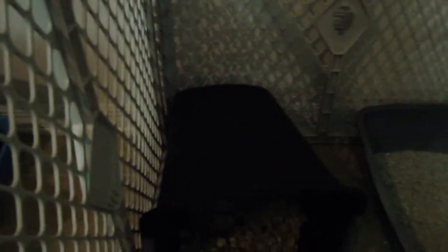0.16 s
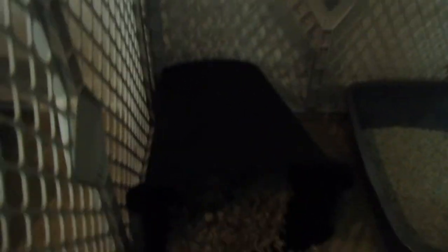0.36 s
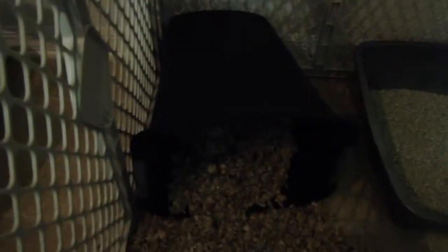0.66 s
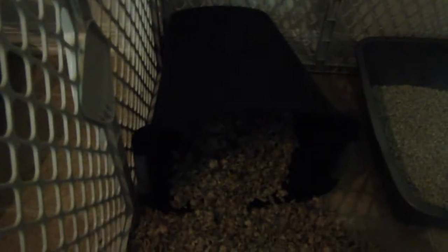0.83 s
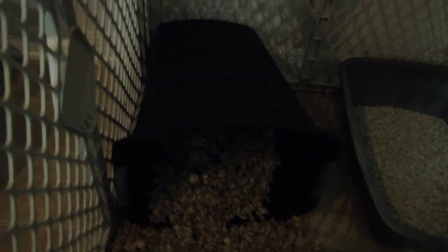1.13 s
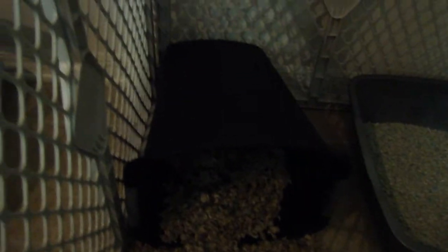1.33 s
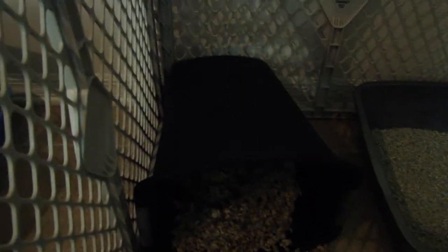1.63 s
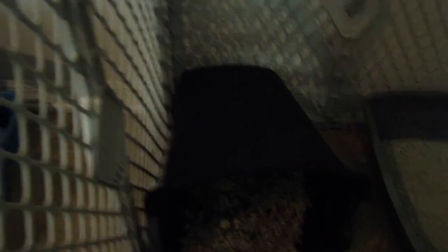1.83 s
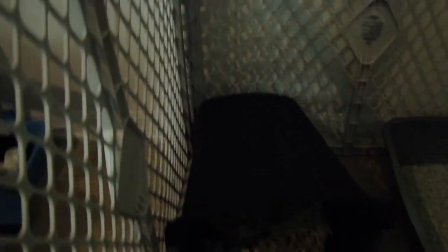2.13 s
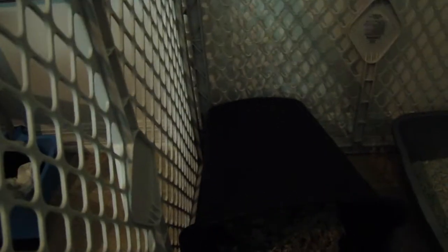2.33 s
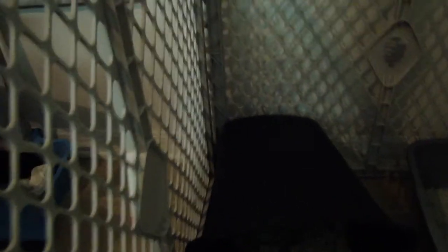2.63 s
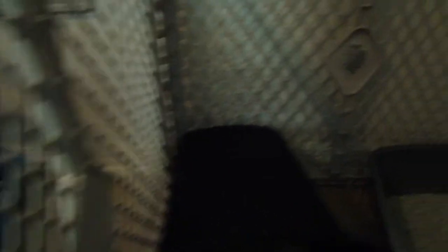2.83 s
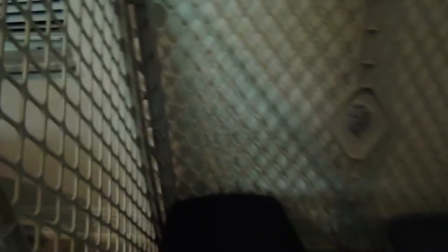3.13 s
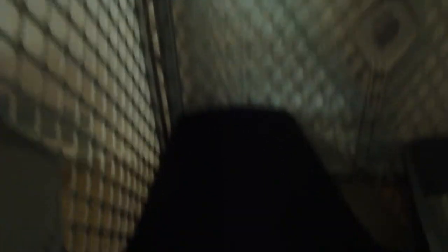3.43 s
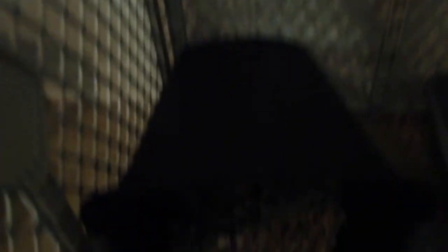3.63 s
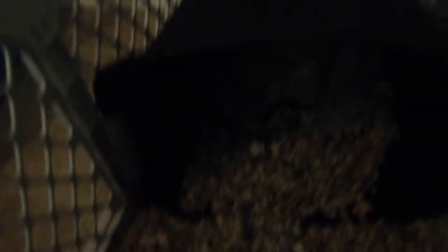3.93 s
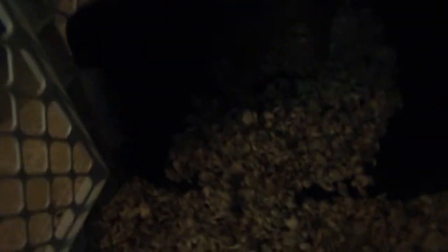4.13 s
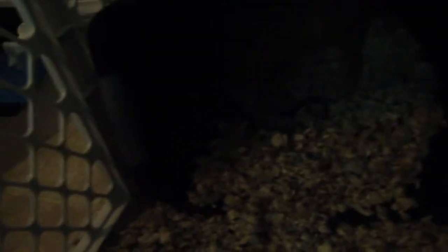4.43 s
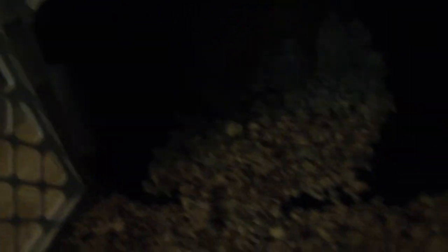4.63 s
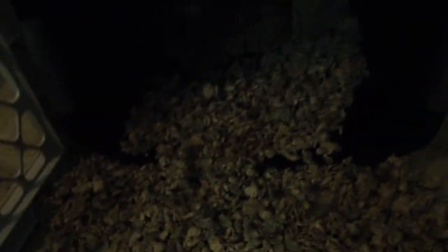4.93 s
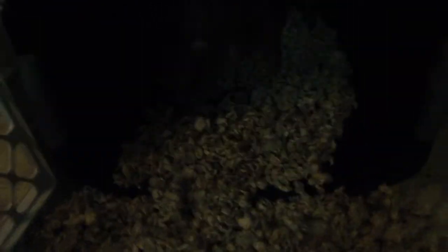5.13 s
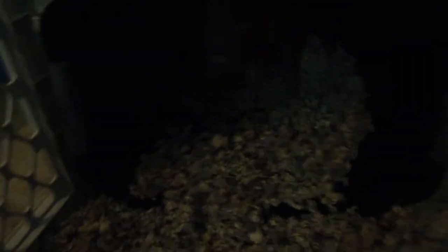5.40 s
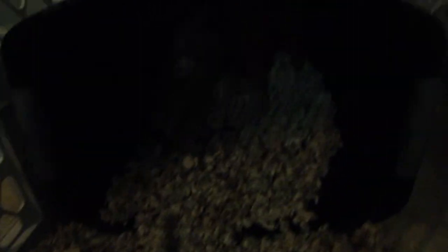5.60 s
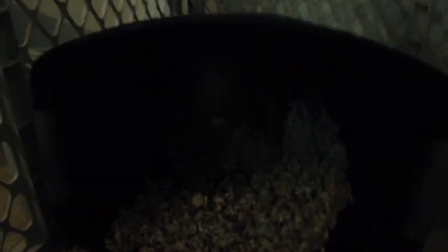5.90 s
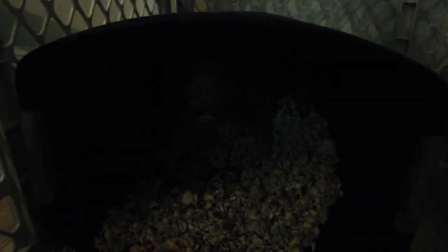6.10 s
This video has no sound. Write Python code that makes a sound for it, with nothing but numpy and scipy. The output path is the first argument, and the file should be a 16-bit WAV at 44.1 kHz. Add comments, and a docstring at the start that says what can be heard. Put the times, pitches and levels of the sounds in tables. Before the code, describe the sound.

Dry wood chips snap, click and rustle close by in irregular bursts, with falling crumbs, a hollow tub, faint wire rings and a thin squeak.

```python
"""Single wood chips snap and knock close by, each followed by a shower of smaller ones; some ring a wire pen.
Under them dry chips rustle, swelling and thinning out, a plastic tub booms along, and a thin squeak sounds twice.
Behind lies a quiet, humming room. Noise bursts through resonances make the snaps, filtered noise and damped sines
make the scrapes and the rustle, and plain sines make the wire, squeak and hums. Wide stereo, often in anti-phase."""
import sys
import numpy as np
from scipy.fft import rfft, irfft, next_fast_len
from scipy.io import wavfile
from scipy.ndimage import map_coordinates

SR = 44100
rng = np.random.default_rng(int(sys.argv[2]) if len(sys.argv) > 2 else 0)


def store_pcm(level_fs):
    """Save levels as 16-bit WAV."""
    pcm = np.round(np.clip(level_fs, -1, 1) * 32767).astype(np.int16)
    wavfile.write(sys.argv[1], SR, np.atleast_2d(pcm).T)


N = 276047

# the bright crack of breaking wood, as a tone colour: f/Hz, relative level/dB
CRACK = [(2500, -7), (4500, 0.5), (7000, -4), (10500, -5), (12500, -11.5), (14400, -43.5)]


def snaps():
    """A snap is a short burst: two modes of the chip, a thud of the bed and a bright crack; then debris falls."""
    # one snap a row: t/s, level/dB, chip f/Hz, crack level/dB, upper mode f/Hz, upper mode level/dB,
    # thud f/Hz, thud level/dB, left over right/dB, width setting (more is wider)/dB, shower level/dB, shower T60/s
    # (crack, upper mode, thud and shower levels are relative to the snap)
    snap_rows = [(0.049, -14.5, 1890, -4.5, 3750, -2, 437, -25, 1, 5.5, -18, 0.13),
                 (0.053, -21.5, 1460, -24, 3670, -0.5, 434, -19, 2.5, 3, -9, 0.073),
                 (0.077, -38, 2100, 1, 3500, -7, 434, -20, 3, 10, -11, 0.04),
                 (0.199, -33, 890, -8, 2500, -8, 430, -10, -1, 8, -4.5, 0.13),
                 (0.234, -32.5, 880, -3.5, 2500, 2, 680, -20, 1.5, 9, -9, 0.06),
                 (0.421, -40.5, 865, -22, 2470, -11, 442, -23, 1, -1, -7, 0.06),
                 (0.604, -29.5, 1490, -16, 2930, 3, 635, -38, 5, 6.5, -1.5, 0.05),
                 (0.625, -36.5, 2270, -30, 2470, -1, 360, -27, 9, 12, -21, 0.11),
                 (0.634, -38, 1440, -17, 2400, -1, 400, -24, 7, 10, -16, 0.045),
                 (0.699, -23.5, 1110, 9, 3170, 7.5, 356, -28, 3, 4, -17.5, 0.19),
                 (0.741, -34.5, 1490, -11, 2680, -5, 240, -12, -1, 6, -5.5, 0.089),
                 (0.751, -37.5, 1890, -2, 2450, -4, 427, -5, 3, 5, -16, 0.21),
                 (0.814, -36, 1420, -16, 2900, -12, 420, -10, 6, 6, -28, 0.085),
                 (0.865, -5.5, 1300, 3, 3420, 0.5, 383, -14, 1, -0.5, -7.5, 0.047),
                 (0.868, -17.5, 1210, 0.5, 3300, 2, 408, -13.5, -5, -1, -17, 0.063),
                 (0.87, -26, 1000, 9.5, 2780, 17, 340, -2.5, -9, 2, -15, 0.063),
                 (0.878, -17, 1480, 8, 3780, 5, 380, -10.5, 3, 6, -24, 0.26),
                 (0.8862, -24, 1190, -16, 3100, -5, 420, -9, -4, 2, -4, 0.053),
                 (0.8923, -32, 1400, 1, 5140, 0, 420, -16, 6.5, 5.5, -18.5, 0.39),
                 (1.359, -23.5, 1500, 6, 4460, -2.5, 656, -13, 2.5, 5, -22, 0.084),
                 (1.447, -41.5, 1900, -11, 2500, -1, 392, -10, 5, 11, -10.5, 0.27),
                 (1.669, -29, 2450, 10.5, 5000, 3, 426, -9, 5, 11, -1.5, 0.11),
                 (1.751, -38.5, 1470, -13, 2380, 0, 370, -23, 6.5, 14, -6, 1),
                 (1.83, -26, 740, 3, 3230, -1, 640, 0, 5, 7, -1, 0.096),
                 (1.8527, -28, 1810, 8, 2380, 14, 650, -1, 3.5, 8, 4.5, 0.12),
                 (1.862, -31, 1790, 4.5, 2700, 11, 500, -13, 5, 6, 3.5, 0.053),
                 (1.871, -35, 1500, 4, 2800, 17, 500, -11, 2, 5.5, 6, 0.055),
                 (1.881, -39, 1500, 13, 2800, 4, 404, -5, 2, 11, -8, 0.051),
                 (1.945, -20, 1920, 10.5, 2830, 9, 543, -15, 4, 8.5, -10, 0.31),
                 (1.957, -26, 1910, 5.5, 2750, 16, 540, -14, 7, 4, -8, 0.089),
                 (2.0, -42, 2300, 2, 2900, 11, 540, -25, -1, -5, -3.5, 0.16),
                 (2.31, -17, 1760, -20, 2350, -11, 500, -19.5, -3, 8, -22.5, 0.059),
                 (2.415, -46.5, 2290, -2, 2490, 0, 400, -8, -2, 9, -7, 0.33),
                 (2.486, -39.5, 1220, 7.5, 4680, -4, 398, -8, -1, 10, 3, 0.05),
                 (2.793, -45.5, 2270, 1, 2650, 5, 400, -13, 1, -4, -8, 0.093),
                 (2.853, -37.5, 1750, -20, 2400, -17, 460, -8, -2, 4, -6, 0.63),
                 (2.979, -33.5, 1920, -14, 2630, -7, 420, -7, 4, -5, -7, 0.073),
                 (3.1, -36, 1920, -9, 2970, -2, 410, -16, -5, 3, -12.5, 0.47),
                 (3.121, -37.5, 1680, 2.5, 3080, -1, 400, -11, 1, 5, -13, 0.26),
                 (3.155, -25, 830, -18, 2100, -14, 436, -6.5, 0.5, 8, -10, 0.12),
                 (3.19, -29, 1240, -25, 2900, -2, 298, 4.5, -0.5, -3, 0.5, 0.067),
                 (3.198, -34, 970, -28, 2540, -15, 250, 9.5, 3, -5, -24, 0.055),
                 (3.255, -36, 785, -17, 4030, -6, 250, -12, 1, 5, -8, 0.14),
                 (3.298, -24.5, 870, -18, 3400, -3.5, 300, -4, -0.5, -2, -17.5, 0.49),
                 (3.34, -40, 870, -20, 2640, -8, 640, 6, -10, 4, -16, 0.06),
                 (3.426, -42, 820, -28, 3910, -9, 493, 7.5, 1, -6, -23, 0.11),
                 (3.473, -38, 850, -6, 3150, -4, 288, 7.5, 2, -8, -5, 0.11),
                 (3.487, -37.5, 1190, -22, 3650, -6, 308, 4, -1, -8, -19, 0.056),
                 (3.523, -39, 1500, -20, 2900, -5, 400, -4, 5, -3, -3, 0.12),
                 (3.546, -28, 1730, -21, 2470, -9, 543, -12, 6, -6, -4, 0.11),
                 (3.552, -25, 1700, -15, 2420, -11, 536, -20, 2, -1, -9, 0.17),
                 (3.583, -28, 1130, -30, 2660, -10, 238, -20, 0, -6, -19, 0.074),
                 (3.599, -34, 2030, -25, 3040, -13, 244, 0, -6, -1, -22, 0.08),
                 (3.667, -43, 920, -25, 3040, -13, 240, -19, 1, -1, -18, 0.05),
                 (3.718, -31, 865, -21, 2540, -17, 605, -2, 0, 9, -4.5, 0.11),
                 (3.764, -34.5, 1290, -33, 2400, -15, 420, -1, -2, 7, -25, 0.11),
                 (3.806, -37.5, 2160, -29, 2340, -8, 310, -14, -3, -3, -8, 0.081),
                 (3.852, -33.5, 1200, -22, 2400, -12, 298, 0, 2, -4, -19, 0.067),
                 (3.873, -26, 970, -39, 2490, -12, 314, -4.5, 1, -7, -27, 0.041),
                 (3.88, -32, 1050, -30, 2400, -15, 258, -4, 2, -12, -2, 0.094),
                 (3.927, -36, 1110, -16, 2960, -17, 279, -2, 0, -12, -4.5, 0.13),
                 (3.985, -50, 1110, -11, 2670, 8, 280, -5, -2, 0, -15, 0.05),
                 (4.033, -41, 1680, -7, 2530, -10, 340, -9, 0, 6, -10, 0.05),
                 (4.075, -36, 1170, -29, 2570, -11, 593, -6, -3, 5, -25, 0.13),
                 (4.0993, -23.5, 1390, -23, 3360, -13, 550, -6, 5, 8, -27, 0.094),
                 (4.1945, -24, 1450, -9, 3400, -25, 610, 0, 2, 5, -6.5, 0.035),
                 (4.3045, -10.5, 1450, -14, 3900, -2, 710, -13.5, -1.5, 5, -15.5, 0.1),
                 (4.471, -26.5, 1300, -21, 3340, -9, 427, -16, -2, 5, -34, 0.18),
                 (4.57, -44, 1870, -23, 2380, -11, 460, -11, 0, -1, -10, 0.24),
                 (4.737, -34.5, 1040, -19, 2400, -9, 467, -4, -12, 5, -23, 0.11),
                 (4.746, -32, 1050, -14, 3450, 1.5, 536, -1.5, 2, 4, -8, 0.27),
                 (4.883, -21, 1430, -4, 3500, -6, 660, -9, -0.5, 5, -10, 0.061),
                 (4.895, -29.5, 1230, -36, 2400, -19, 430, -14, 4, 13, -17, 0.1),
                 (4.932, -36.5, 1310, -31, 2490, -21, 400, -1, -3, 4, -29, 0.1),
                 (4.977, -35.5, 1640, -22, 2400, -18, 440, -6, -3, 4, -7, 0.17),
                 (4.991, -22.5, 934, -33, 3340, -11, 610, -9, -3.5, 7, -14.5, 0.082),
                 (5.0, -30.5, 955, -8, 3210, -10, 430, -16, 0, 5, -13, 0.11),
                 (5.034, -36.5, 760, -17, 2410, -7, 590, -5, 0, 8, 2.5, 0.062),
                 (5.122, -30, 1060, -21, 2420, -14, 466, -3.5, -4, 7, -23, 0.33)]
    burst_t60_s, strike_s = 0.019, 0.0009
    strike = 60, 32, 24  # the clean blow against the noise of the break: chip, upper mode, thud
    low_cut_hz = 130  # chips are too small to sound much below this
    out = np.zeros((2, N + SR))
    t = np.arange(SR // 12) / SR
    blow = amp(-60 * t / burst_t60_s) * (1 - np.exp(-(t / 0.0016) ** 2))
    crack_blow = blow ** 3.6 * (1 - np.exp(-t / 0.0014))  # dies away sooner
    thud_blow = blow ** 0.31  # dies away later
    for (s, db, hz, crack_db, upper_hz, upper_db, thud_hz, thud_db,
         pan_db, wide_db, shower_db, shower_t60) in snap_rows:
        mid, other = rng.standard_normal((2, 4, len(t)))
        mid[:3, round(strike_s * SR)] += strike
        # the side signal is partly the mid, delayed a little
        side = 0.64 * np.roll(mid, rng.integers(3, 14), axis=1) + 1.14 * other
        # the thud is more alike at both ports
        side = side * amp(wide_db - 5.0) * [[1.1], [1.3], [.55], [1.1]]
        chip, upper, thud, crack = np.swapaxes([mid, side], 0, 1)

        # bright snaps are broad and dry, dull ones ring at the chip's pitch
        flat = amp(-13 + 0.66 * crack_db)

        def chip_tone(f):
            ringing = mode(f, hz, 0.26 * hz) * mode(f, hz, 0.89 * hz)
            return ringing + flat * mode(f, hz, 1.5 * hz)

        def upper_tone(f):
            return (mode(f, upper_hz, 0.16 * upper_hz) + flat) * mode(f, upper_hz, 0.51 * upper_hz)

        def thud_tone(f):
            narrower = mode(f, thud_hz, 0.77 * thud_hz) * mode(f, thud_hz, 0.79 * thud_hz)
            return narrower * mode(f, thud_hz, 3.0 * thud_hz)

        layers = [filtered(chip * blow, chip_tone),
                  filtered(upper * blow, upper_tone),
                  filtered(thud * thud_blow, thud_tone),
                  filtered(crack * crack_blow, lambda f: amp(along(CRACK, f)))]
        levels = 0, upper_db, thud_db, crack_db
        # each layer is set by the peak of its mid
        mid, side = sum(amp(level) * x / np.abs(x[0]).max() for x, level in zip(layers, levels))
        debris = shower(hz, crack_db, wide_db, shower_db, shower_t60)
        gain = amp(db + np.array([[.5], [-.5]]) * pan_db)
        at = round(s * SR)
        out[:, at:at + len(t)] += gain * [mid + side, mid - side]
        out[:, at:at + debris.shape[1]] += gain * debris
    return filtered(out[:, :N], lambda f: (1j * f / (low_cut_hz + 1j * f)) ** 2)


def shower(hz, crack_db, wide_db, level_db, t60):
    """Falling debris is fading clumpy noise that shares the pitch and brightness of the chip that broke."""
    # the part of the colour that all showers share: f/Hz, relative level/dB
    debris_colour = [(70, -54.5), (150, -9), (400, 6), (1300, 1), (2800, -4.5), (5000, -18.5),
                     (10500, -40.5), (12500, -26), (13600, -38)]
    t = np.arange(SR // 3) / SR

    def colour(f):
        pitch = np.abs(mode(f, hz, 1.2 * hz)) ** 2.9
        bright = amp(crack_db - 5.5 + along(CRACK, f))
        return pitch + bright + amp(along(debris_colour, f) - 5.0)

    debris = spread(grains(len(t), spiky_db=0.5, clump_s=0.0014), colour, narrow=0.59)
    fall = amp(level_db - 60 * t / t60) * (1 - np.exp(-t / 0.0037))
    return widened(debris, 0.38 * wide_db - 0.1) * fall


def mesh():
    """Flung chips ring several like wires as decaying sines; the ports hear the same wires at different phases."""
    # tones of the wire mesh: middle f/Hz, level against the hit/dB, T60/s
    wire_tones = [(1765, -16, 0.273), (2670, -6.5, .25), (3080, -7.5, 0.21), (3730, -7, 0.21),
                  (4570, -11.5, 0.31), (5880, -10, 0.246), (7470, -19.5, .25), (8300, -11, 0.222),
                  (10200, -12.5, 0.16), (10900, -4, 0.16)]
    # chips flung on the wire: t/s, level/dB
    hits = [(0.868, -41.5), (1.67, -41.5), (1.854, -35), (1.946, -30), (1.959, -36), (2.0, -43)]
    split = .045  # wires differ in length, so their tones scatter by this share
    out, t = np.zeros((2, N + SR)), np.arange(SR // 3) / SR
    hz, level, t60 = np.transpose(wire_tones)[:, :, None]
    for s, db in hits:
        at = round(s * SR)
        # nine wires
        for detune, size, turn in rng.standard_normal((9, 3, len(wire_tones), 1)):
            ring = amp(db + level + 1.5 * size - 60 * t / t60) * (1 - np.exp(-t / .002))
            phase = 2 * np.pi * hz * (1 + split * detune) * t
            left = (ring * np.sin(phase)).sum(0)
            right = (ring * np.sin(phase + 2.17 * turn)).sum(0)
            out[:, at:at + len(t)] += [left, right]
    return out[:, :N]


def scrapes():
    """A chip or the tub is dragged along: while a stroke lasts, chips of like size collide and rub."""
    # one stroke a row: loudest t/s, length/s, centre f/Hz, width of the resonance/Hz, level before the mix/dB
    strokes = [(0.091, 0.15, 8470, 6000, -49.5), (0.228, 0.068, 1830, 3080, -41),
               (0.405, 0.05, 8570, 5970, -51.5), (0.63, 0.066, 2720, 1200, -48.5),
               (0.732, 0.05, 2460, 2520, -40), (1.348, 0.0201, 500, 520, -37),
               (1.427, 0.091, 2390, 900, -51.5), (1.657, 0.099, 1910, 1590, -44),
               (1.786, .12, 1199, 1460, -42.5), (1.809, 0.042, 2400, 900, -41),
               (1.801, 0.046, 460, 400, -40), (1.866, 0.052, 620, 450, -36), (1.868, 0.11, 269, 193, -38.5),
               (1.86, 0.055, 2557, 2330, -29), (1.947, 0.014, 10300, 4940, -15.5),
               (1.957, 0.05, 3000, 1500, -27.5), (2.025, 0.21, 2884, 1480, -45),
               (2.493, 0.056, 6000, 8000, -47), (2.373, 0.066, 410, 300, -54), (2.587, 0.19, 256, 144, -51),
               (2.583, .09, 686, 507, -46.5), (2.621, 0.086, 2264, 3480, -40),
               (2.873, 0.11, 1860, 890, -45.5), (2.982, 0.067, 2040, 1200, -45),
               (3.102, 0.058, 4900, 7800, -45.5), (3.205, .04, 258, 121, -32.5),
               (3.224, 0.11, 235.5, 70, -39), (3.296, 0.029, 860, 1210, -29),
               (3.349, 0.12, 1470, 2070, -51), (3.579, 0.12, 1580, 1840, -36.5),
               (3.601, .15, 237, 58, -41.5), (3.777, .15, 147, 50, -56), (3.888, 0.048, 293, 120, -38),
               (3.932, 0.074, 268, 119, -44), (4.212, 0.072, 495, 403, -42.5),
               (4.326, 0.012, 1460, 600, -30), (4.33, .012, 1600, 500, -27),
               (4.338, 0.021, 1420, 513, -20.5), (4.343, 0.048, 4900, 4000, -43.5),
               (4.336, .062, 1385, 750, -28), (4.363, 0.024, 1590, 800, -32.5),
               (4.389, 0.032, 1800, 900, -43), (4.756, 0.034, 884, 1200, -34.5),
               (4.475, .025, 925, 500, -38.5), (4.822, 0.056, 2480, 3000, -46.5),
               (4.902, 0.051, 610, 700, -36.5), (5.057, 0.094, 1705, 700, -51.5),
               (5.351, .1, 1494, 900, -53.5), (5.597, 0.11, 761, 710, -47.5)]
    rise = 0.34  # share of the stroke before its loudest moment
    out = np.zeros((2, N))
    for top, length, hz, width_hz, db in strokes:
        at = round((top - rise * length) * SR)
        u = np.linspace(0, 1, round(length * SR))
        stroke = np.interp(u, [0, rise, 1], [0, 1, 0]) ** 0.85
        noise = grains(len(u), spiky_db=1.2, clump_s=0.0013)
        rub = spread(noise, lambda f: mode(f, hz, width_hz) ** 2, narrow=0.38)
        knocks = chips(len(u), 0.5 * hz + 120, hz, octaves=0.368 * width_hz / hz, cycles=11.7, spiky_db=8.5)
        out[:, at:at + len(u)] += amp(db) * stroke * (0.49 * rub + 0.4 * knocks)
    return out


def stirring():
    """Chips slide in uneven surges; coarse ones knock on the tub, fine ones fizz: noise plus damped sines."""
    # strength of the sliding, before the mix and the surges: t/s, rustle level/dB, fizz level/dB
    slide = [(0.0, -53, -61.5), (0.38, -52, -59.5), (0.61, -53, -62.5), (0.9, -46, -62.5),
             (1.15, -62.5, -66), (1.5, -66.5, -64.5), (1.71, -45.5, -61), (1.85, -39, -43),
             (1.93, -49, -49.5), (2.2, -57.5, -61.5), (2.7, -52, -60), (3.03, -49.5, -55.5),
             (3.24, -40, -58.5), (3.4, -47, -59), (3.59, -36.5, -49.5), (3.73, -49, -61.5),
             (3.87, -39, -54), (4.04, -52, -60), (4.51, -54, -62.5), (4.85, -50, -61), (5.25, -57, -64),
             (6.26, -64, -65.5)]
    # tone colours of tub, rustle and fizz noise, each: f/Hz, relative level/dB
    tub_colour = [(60, -29.5), (150, -38.5), (230, 1.5), (420, 4), (700, -12.5), (1400, -46.5)]
    rustle_colour = [(250, -26.5), (600, 4), (1100, 2.5), (1900, 1), (3000, 0.5), (4500, -7), (8000, -71)]
    fizz_colour = [(1800, 3.5), (4000, 8), (6000, 3.5), (8000, 1), (10500, 1.5), (12500, -4.5),
                   (13400, -20)]
    rustle_db, fizz_db = curves(slide)
    boom_db = -23.5 + 0.66 * rustle_db  # the tub booms with the rustle, but swings less
    surge = wobble(30)

    tub_noise = spread(rng.standard_normal((2, N)), tub_colour, narrow=0.68)
    tub_knocks = chips(N, 300, 405, octaves=0.72, cycles=7.1, spiky_db=1.5)
    boom = 0.65 * tub_noise + 0.39 * tub_knocks

    sliding = spread(grains(N, spiky_db=0.5, clump_s=0.0026), rustle_colour, narrow=1.0)
    clicks = chips(N, 450, 1584, octaves=0.797, cycles=21.4, spiky_db=4.5)
    rustle = 0.35 * sliding + 0.43 * clicks

    fizz = spread(grains(N, spiky_db=0.0, clump_s=0.00043), fizz_colour)
    out = amp(boom_db + 2.1 * wobble(35)) * boom
    out = out + amp(rustle_db + surge) * rustle
    return out + amp(fizz_db + 2.0 * surge) * fizz


def squeak():
    """A thin, high squeak is one wavering sine, faded in and out."""
    # two squeaks, each a list of points, before wavering and the lean to the left: t/s, f/Hz, level/dB
    squeak_paths = [
        [(3.128, 10700, -64), (3.168, 11450, -61), (3.22, 11350, -63), (3.265, 11550, -62), (3.3, 11300, -60),
         (3.33, 11000, -55), (3.352, 11150, -52), (3.372, 11000, -54), (3.392, 10650, -62)],
        [(3.462, 10700, -64), (3.48, 11050, -54), (3.492, 11020, -55), (3.51, 10600, -65)],
    ]
    out, t = np.zeros(N), np.arange(N) / SR
    for rows in squeak_paths:
        hz, db = curves(rows)
        fade = np.clip(np.minimum(t - rows[0][0], rows[-1][0] - t) / 0.0067, 0, 1)
        phase = 2 * np.pi * np.cumsum(hz + 35 * wobble(180)) / SR
        out += fade * amp(db + 2.0 * wobble(60)) * np.sin(phase)
    return out * amp([[2.5], [-2.5]])


def room():
    """The quiet room is steady filtered noise, a faint hum that comes and goes, and a low hum that throbs evenly."""
    # tone colour of the hiss: f/Hz, relative level/dB
    hush_colour = [(15, -50), (25, -14.5), (119, -8), (151, -10.5), (231, -7.5), (414, -7), (525, -5),
                   (632, -6.5), (1360, -10.5), (1560, -10), (2440, -15), (9660, -39), (14000, -60)]
    # the faint hum, before slight wavering: start t/s, end t/s, f/Hz, level/dB
    faint_hums = [(0.1, 1.05, 360, -68), (1.38, 1.65, 360, -64)]
    hush_db = -59
    throb_from_s, throb_hz, throb_db, throb_depth = 3.85, 121, -66.5, 0.54
    throbs_per_s, throb_top_s = 3.62, 5.0  # the top is one of the loudest moments
    t = np.arange(N) / SR
    out = amp(hush_db) * spread(rng.standard_normal((2, N)), hush_colour)
    for start, end, hz, db in faint_hums:
        fade = np.clip(np.minimum(t - start, end - t) / 0.04, 0, 1)
        phase = 2 * np.pi * np.cumsum(hz + wobble(6)) / SR
        out = out + fade * amp(db + 3 * wobble(8)) * np.sin(phase)
    throb = 1 + throb_depth * np.cos(2 * np.pi * throbs_per_s * (t - throb_top_s))
    fade_in = np.clip((t - throb_from_s) / .3, 0, 1)
    return out + fade_in * amp(throb_db) * throb * np.sin(2 * np.pi * throb_hz * t)


def chips(size, rate, hz, octaves, cycles, spiky_db):
    """Stereo stream of chip collisions: damped sines of scattered pitch, size and side; mean rms 1."""
    count = int(size * rate / SR) + 2
    when = rng.random(count)
    pitch, big, lean, phase = rng.standard_normal((4, count))[:, :, None]
    f = np.clip(hz * 2 ** (octaves * pitch), min(.6 * hz, 200), 13000)
    t = np.arange(min(int(2 * cycles / hz * SR), 3000)) / SR
    # each chip falls by 40 dB in the given number of cycles
    ring = amp(spiky_db * big - 40 * t * f / cycles) * (1 - np.exp(-3 * t * f))
    at = ((when * size).astype(int)[:, None] + np.arange(len(t))).ravel()
    shift = (0.95 + 1.32 * phase) * f / (f + 350)  # bass arrives nearly in step
    left = amp(3.8 * lean) * ring * np.sin(2 * np.pi * f * t)
    right = amp(-3 * lean) * ring * np.sin(2 * np.pi * f * t + shift)
    # add up all chips at their own moments
    pair = np.array([np.bincount(at, x.ravel(), size + len(t))[:size] for x in (left, right)])
    return pair / np.sqrt(np.mean(pair.mean(0) ** 2) + 1e-20)


def grains(size, spiky_db, clump_s):
    """Two streams of tiny contacts: noise whose strength jumps from one short clump to the next."""
    hold = max(round(clump_s * SR), 1)
    sizes = np.minimum(rng.exponential(size=size // hold + 1), 3)
    strength = np.repeat(amp(spiky_db * sizes), hold)[:size]
    return unit(rng.standard_normal((2, size)) * strength)


def spread(pair, colour, narrow=0):
    """Colours two streams and mixes them as mid and side; the left-right mean has rms 1."""
    # how alike left and right are, below 0 for anti-phase, before narrowing: f/Hz, likeness (-1 to 1)
    likeness = [(60, 0.85), (130, -0.41), (280, -0.5), (620, -0.61), (1340, -0.68), (2910, -0.45),
                (6320, -0.17), (13700, -0.084)]

    def shape(hz):
        return colour(hz) if callable(colour) else amp(along(colour, hz))

    def turn(hz):
        return np.arccos(np.clip(along(likeness, hz) + narrow, -.95, .95)) / 2

    mid, side = filtered(pair, lambda hz: shape(hz) * [np.cos(turn(hz)), np.sin(turn(hz))])
    return np.array([mid + side, mid - side]) / np.sqrt(np.mean(mid ** 2))


def widened(pair, wide_db):
    """Raises or lowers the side (left-right difference) of a stereo pair."""
    mid = pair.mean(0)
    side = amp(wide_db) * (pair[0] - pair[1]) / 2
    return np.array([mid + side, mid - side])


def mode(f, hz, width_hz):
    """A causal resonance: the response of one vibrating mode, 1 at its own pitch."""
    return 1j * f * width_hz / (hz * hz - f * f + 1j * f * width_hz)


def filtered(x, response):
    """x times a complex response of frequency."""
    m = next_fast_len(x.shape[-1] + 2048)
    spectrum = rfft(x, m) * response(np.fft.rfftfreq(m, 1 / SR))
    return irfft(spectrum, m)[..., :x.shape[-1]]


def wobble(rate):
    """A smooth random curve, rate knots a second."""
    knots = rng.standard_normal(int(N * rate / SR) + 4)
    return map_coordinates(knots, [np.arange(N) * rate / SR])


def curves(rows):
    """One value per sample for each column after the time."""
    s, *cols = np.transpose(rows)
    return [np.interp(np.arange(N) / SR, s, c) for c in cols]


def along(points, hz):
    """Reads a curve of (Hz, value) points on a log frequency axis."""
    f, v = np.transpose(points)
    return np.interp(np.log(hz + 1), np.log(f + 1), v)


def unit(x):
    """Scales x to rms 1."""
    return x / np.sqrt(np.mean(x ** 2) + 1e-20)


def amp(db):
    """Turns decibels into a plain factor."""
    return 10 ** (np.asarray(db) / 20)


def scene():
    """All sources together, as stereo."""
    return snaps() + mesh() + scrapes() + stirring() + squeak() + room()


def record(dry):
    """The small microphone drops the top; then the sound clips softly, loses bass and ends at a band limit."""
    # response of the microphone: f/Hz, gain/dB
    mic_response = [(20, 0), (12200, 0), (12800, -7), (13200, -25), (14400, -34)]
    top_hz, bass_cut_hz = 14400, 90
    heard = filtered(dry, lambda hz: amp(along(mic_response, hz)))
    held = heard / (1 + np.abs(heard) ** 8) ** (1 / 8)  # soft clip at 1

    def band(hz):
        top = np.clip((top_hz - hz) / 300, 0, 1) ** 2
        return top * hz ** 3 / (hz ** 3 + bass_cut_hz ** 3)

    return filtered(held, band)


dry = scene()
out = record(dry)
store_pcm(out)
```